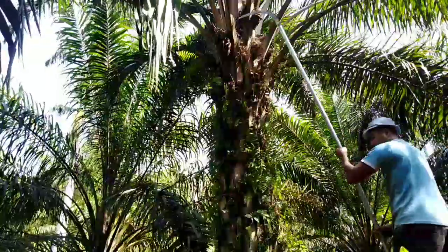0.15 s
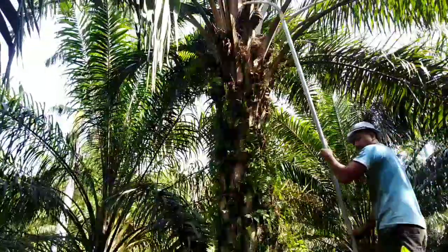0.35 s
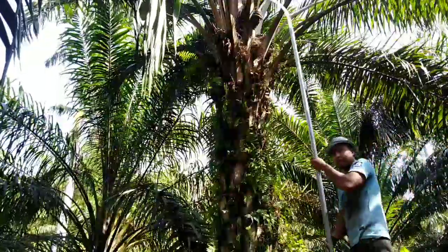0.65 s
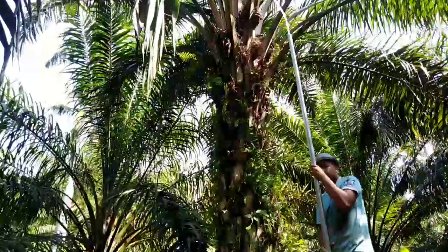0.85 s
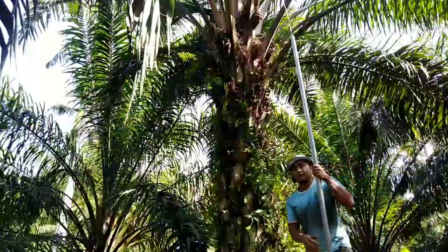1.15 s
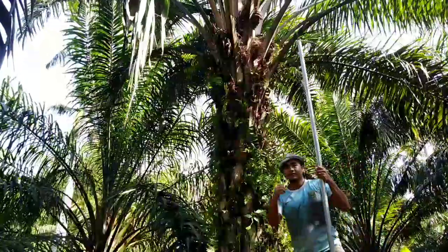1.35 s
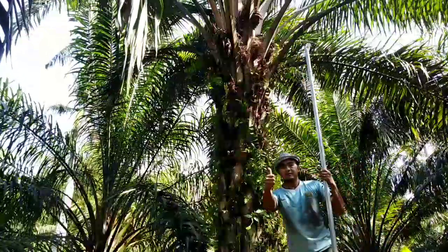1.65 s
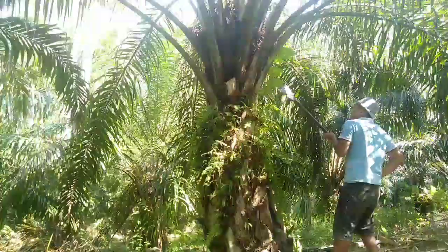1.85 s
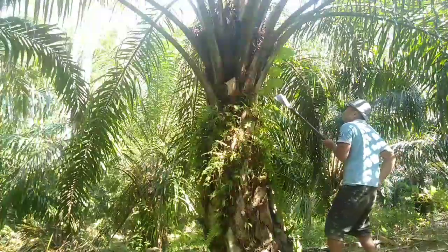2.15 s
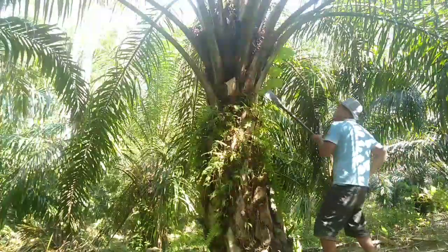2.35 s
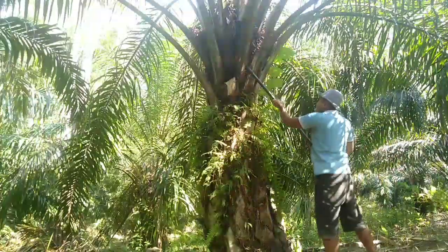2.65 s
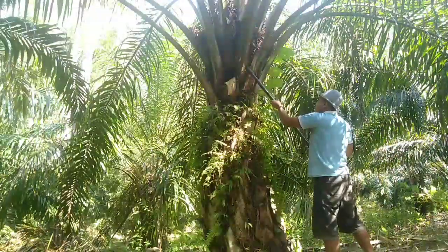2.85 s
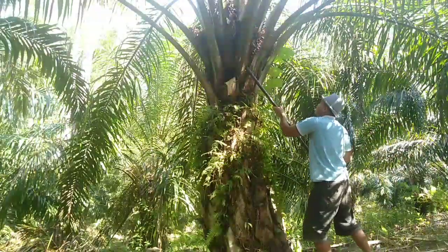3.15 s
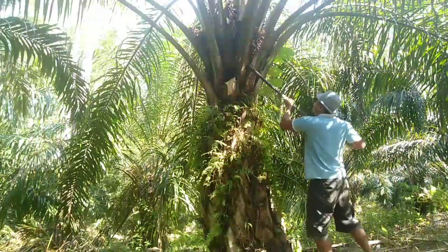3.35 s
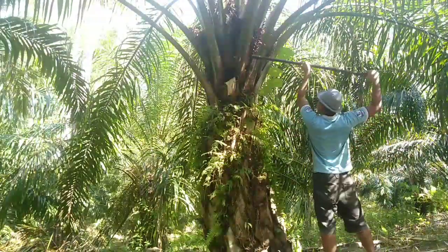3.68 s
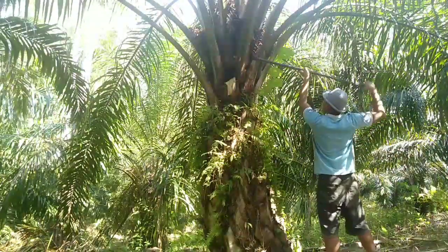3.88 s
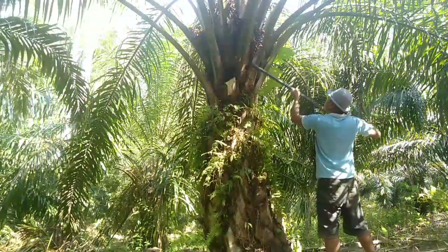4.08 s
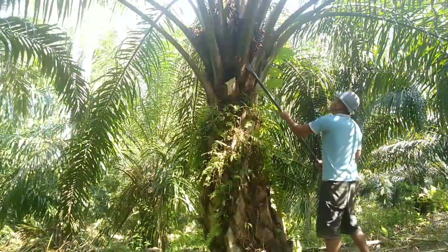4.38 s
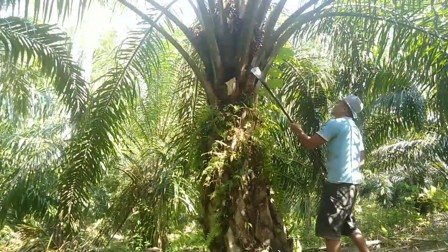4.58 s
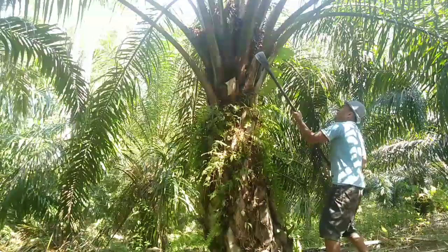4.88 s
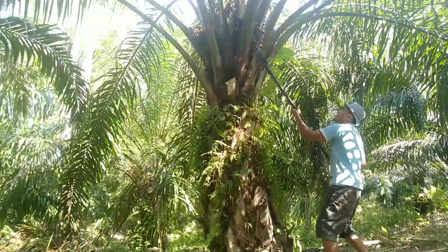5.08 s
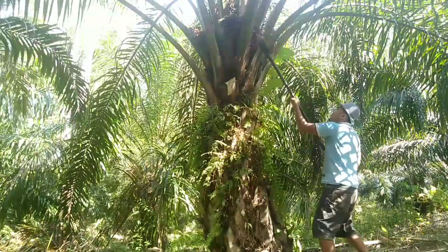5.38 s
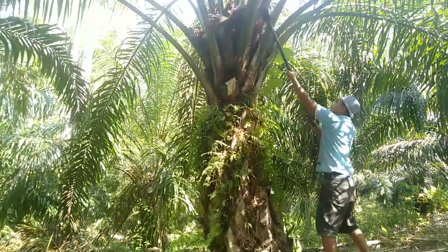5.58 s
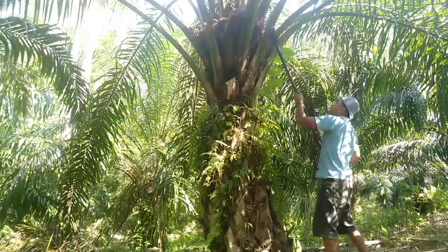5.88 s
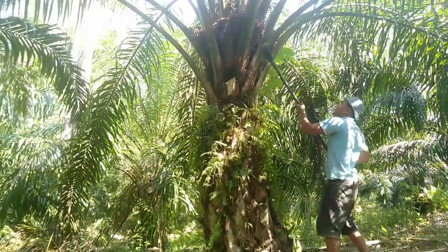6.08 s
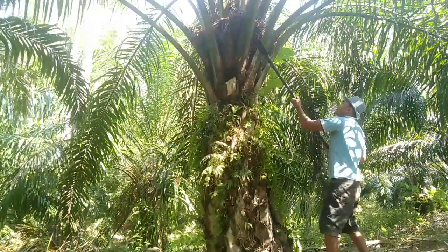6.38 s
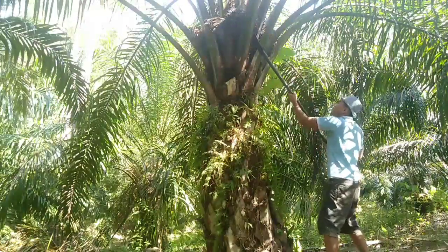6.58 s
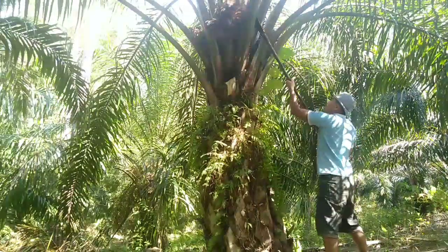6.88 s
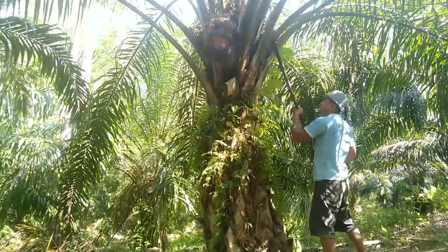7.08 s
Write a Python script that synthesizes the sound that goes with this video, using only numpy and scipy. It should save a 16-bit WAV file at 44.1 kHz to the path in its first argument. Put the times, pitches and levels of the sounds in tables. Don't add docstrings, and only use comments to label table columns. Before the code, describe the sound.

Dry palm fronds rustle and scrape under a long pole, then sharp chops, fibre cracks and tearing bursts over a faint engine drone.

```python
import sys
import numpy as np
from scipy import signal
from scipy.io import wavfile
from scipy.ndimage import uniform_filter1d

SR = 44100
rng = np.random.default_rng(int(sys.argv[2]) if len(sys.argv) > 2 else 0)


def wav_out(sig):
    wavfile.write(sys.argv[1], SR, np.round(np.clip(np.atleast_2d(sig).T, -1, 1) * 32767).astype(np.int16))


def elevation(decibels):
    levels = np.asarray(decibels, float)
    return 10 ** (levels / 20)


N = 318843
MOVE_S = 2.105


def rms_one(x):
    return x / np.sqrt(np.mean(x ** 2) + 1e-20)


def peak_one(x):
    return x / np.max(np.abs(x))


def in_time(tables):
    held = [np.r_[later[0][0] - .002, rows[-1][1:]][None] for rows, later in zip(tables, tables[1:])]
    rows = np.concatenate(list(tables) + held)
    s, *columns = rows[np.argsort(rows[:, 0])].T
    return [np.interp(np.arange(N) / SR, s, column) for column in columns]


def at_hz(points, hz):
    point_hz, value = np.array(points).T
    return np.interp(np.log(hz), np.log(point_hz), value)


def drift(rate_hz):
    r = np.exp(-80 * np.pi * rate_hz / SR)
    slow = signal.lfilter([1], [1, -2 * r, r * r], rng.standard_normal(N // 40 + 2002))
    slow = rms_one(slow[2000:])
    return np.interp(np.arange(N) / 40, np.arange(len(slow)), slow)


def resonate(x, hz, width_hz):
    r = np.exp(-np.pi * width_hz / SR)
    zeros = np.array([1, 0, -1]) * (1 - r * r) / 2
    return signal.lfilter(zeros, [1, -2 * r * np.cos(2 * np.pi * hz / SR), r * r], x)


def twice(x, hz, width_hz):
    return resonate(resonate(x, hz, width_hz), hz, width_hz)


def add(out, sound, s, pan_db=0, lag=0):
    end = round(MOVE_S * SR) if s < MOVE_S else N
    for row, channel, sign, late in zip(sound * np.ones((2, 1)), out, [.5, -.5], [lag, 0]):
        i = round(s * SR) + late
        channel[i:min(i + len(row), end)] += row[:end - i] * elevation(sign * pan_db)


# [f/Hz, likeness -1..1]
ALIKE_FIRST = [(60, 0.7), (180, 0.6), (540, 0.7), (1630, -0.32), (4900, -0.1), (14700, 0.2)]
ALIKE_SECOND = [(60, .9), (180, 0.7), (540, 0.8), (1630, 0.083), (4900, 0.27), (14700, 0.1)]


def stereo_bands(edges_hz, gain_db_of_hz, grit, patchy_db, patch_rate):
    out, white = 0, rng.standard_normal((2, 2, N)) * grit
    first = np.arange(N) < MOVE_S * SR
    for k, (low, high) in enumerate(zip(edges_hz, edges_hz[1:])):
        band = signal.butter(2, [low, high], "band", fs=SR, output="sos")
        mid, side = rms_one(signal.sosfilt(band, white[k % 2]))
        hz = np.sqrt(low * high)
        alike = np.where(first, at_hz(ALIKE_FIRST, hz), at_hz(ALIKE_SECOND, hz))
        alike = np.clip(alike, -1, 1)
        gain = elevation(gain_db_of_hz(hz) + patchy_db * drift(patch_rate))
        out = out + gain * (np.sqrt(1 + alike) * mid + np.sqrt(1 - alike) * side * [[1], [-1]])
    return out


# [f/Hz, level/dB per Hz]
RUMBLE_COLOUR = [(12, -50), (20, -54), (59, 2.5), (140, 3), (170, 0), (300, -35.5), (390, -58), (660, -120)]
# [t/s, rumble level/dB, exhaust note level/dB]
ENGINE_LEVELS = [
    [(0.0, -50, -55), (0.77, -50.5, -62.5), (2.1, -52, -84.5)],
    [(2.11, -62, -65), (2.88, -52, -53), (3.06, -56.5, -58), (6.74, -52.5, -48), (7.23, -55, -50.5)],
]
EXHAUST_HZ = 150.7


def engine():
    rumble_db, note_db = in_time(ENGINE_LEVELS)
    edges_hz = 20 * 2 ** np.arange(0, 4.1, .33)

    def band_db(hz):
        return at_hz(RUMBLE_COLOUR, hz) + 10 * np.log10(hz)

    rumble = stereo_bands(edges_hz, band_db, 1, patchy_db=1.0, patch_rate=4.6)
    note_hz = EXHAUST_HZ + 1.3 * drift(8.5)
    note = elevation(note_db + 1.0 * drift(12)) * np.sin(2 * np.pi * np.cumsum(note_hz) / SR)
    return elevation(rumble_db) * rms_one(rumble) + note


# [t/s, peak level/dB, f/Hz, t60/s]
GROUND_THUMPS = [(0.222, -28, 163, 0.066), (0.284, -20, 59.6, 0.088), (0.296, -15.5, 78.5, 0.045),
                 (0.462, -33, 95.5, 0.026), (0.554, -36, 94.2, 0.052), (0.647, -24, 122, 0.082),
                 (0.679, -32, 88.8, 0.023), (0.843, -20.5, 102, 0.077), (1.065, -20.5, 85, 0.14),
                 (1.073, -32, 88.5, 0.44), (1.563, -45, 109, 0.21), (1.843, -30, 101, 0.065),
                 (1.925, -35.5, 117, 0.082), (2.54, -20, 209, 0.0096), (2.589, -11.5, 300, 0.076),
                 (2.817, -36, 187, 0.23), (4.417, -41, 255, 0.052), (4.55, -35.5, 139, 0.058),
                 (4.563, -35, 221, 0.057), (5.302, -24, 209, 0.15), (5.738, -21.5, 222, 0.021),
                 (6.359, -30.5, 195, 0.026), (6.571, -29, 150, 0.19), (6.632, -27, 234, 0.06)]
# [t/s, peak level/dB, f/Hz, t60/s]
STALK_KNOCKS = [(0.283, -27, 542, 0.033), (1.059, -23, 427, 0.044), (1.297, -42, 381, 0.18),
                (1.565, -38, 680, 0.026), (1.931, -34, 395, 0.073), (2.552, -17, 334, 0.11),
                (2.58, -9, 461, 0.05), (2.591, -13.5, 304, 0.056), (2.608, -14, 350, 0.017),
                (2.826, -24.5, 450, 0.051), (2.845, -23, 367, 0.052), (3.371, -45.5, 382, 0.058),
                (3.418, -38.5, 419, 0.086), (3.519, -35, 405, 0.12), (3.652, -28.5, 485, 0.04),
                (3.605, -32, 457, 0.044), (3.618, -32, 403, 0.055), (3.641, -29.5, 470, .04),
                (3.688, -35, 432, 0.075), (3.72, -38.5, 367, 0.099), (0.912, -36, 400, .03),
                (4.273, -54, 317, 0.077), (4.418, -47, 460, 0.068), (4.356, -50, 306, 0.076),
                (4.506, -29, 520, 0.042), (5.305, -10.5, 635, 0.036), (5.587, -29.5, 433, 0.078),
                (5.614, -33, 410, 0.037), (5.732, -21.5, 440, 0.021), (6.419, -30.5, 580, 0.021),
                (6.843, -34, 313, 0.053), (5.309, -21, 386, 0.071), (5.32, -21, 306, 0.023),
                (1.079, -24, 475, 0.054)]
FIRST_LAG = 10


def thumps():
    out, t = np.zeros((2, N)), np.arange(7000) / SR
    for s, peak_db, hz, t60 in GROUND_THUMPS + STALK_KNOCKS:
        fade = elevation(-60 * t / max(t60, .01)) * (1 - np.exp(-t * hz / 0.17))
        puff = rms_one(twice(rng.standard_normal(len(t)), 0.56 * hz, 4.75 * hz))
        thump = peak_one(fade * (np.sin(2 * np.pi * hz * t) + 0.32 * puff))
        add(out, elevation(peak_db) * thump, s, -1.2, lag=FIRST_LAG * (s < MOVE_S))
    return out


# [t/s, length/s, start f/Hz, end f/Hz, level/dB]
RUBS = [(0, .13, 2930, 2930, -50), (.11, .07, 1780, 1880, -49), (3.93, .1, 850, 830, -61),
        (4.19, .3, 1940, 2080, -61), (4.51, .1, 2860, 2960, -55), (4.54, .08, 4780, 4780, -62),
        (4.5, .12, 4050, 4050, -63), (4.57, .11, 1560, 1550, -64), (4.55, .07, 2040, 2010, -57),
        (5.155, .035, 1800, 1800, -58), (3.37, .1, 900, 920, -62), (3.42, .14, 450, 400, -57),
        (3.43, .1, 1280, 1330, -58), (3.43, .08, 680, 660, -58), (4.25, .07, 1450, 1420, -66)]


def creaks():
    out = np.zeros((2, N))
    broken_db, wobble_hz = 2.5 * drift(70), 14.0 * drift(60)
    for s, length, start_hz, end_hz, level_db in RUBS:
        i, along = round(s * SR), np.linspace(0, 1, int(length * SR))
        span = slice(i, i + len(along))
        hz = start_hz + (end_hz - start_hz) * along + wobble_hz[span]
        fade = np.minimum(along / 0.014, 1) * np.minimum((1 - along) / 0.024, 1)
        tone = np.sin(2 * np.pi * np.cumsum(hz) / SR)
        add(out, elevation(level_db + broken_db[span]) * fade * tone, s)
    return out


# [t/s, level/dB, rise/s]
STROKES = [
    (.8392, -20, .0015),
    (.908, -28, .007),
]
# [f/Hz, level in the bite/dB, level in the slip/dB, t60/s]
POLE_MODES = [(880, -10, -8, .2), (1100, -14, -14, .15), (1400, -3, -8, .12), (1630, 2, -10, .12),
              (1880, -4, -7, .14), (2200, -11, -14, .08), (2520, -5, 0, .12), (2990, -6, -7, .13),
              (3480, -8, -9, .13), (3850, -10, -6, .1), (4200, -11, -10, .12), (4880, -10, -9, .12),
              (5450, -13, -11, .08)]


def pole():
    out, t = np.zeros((2, N)), np.arange(6000) / SR
    for k, (s, hit_db, rise_s) in enumerate(STROKES):
        for hz, *mode_db, t60 in POLE_MODES:
            flutter = rms_one(resonate(rng.standard_normal((2, len(t))), hz, 80.0))
            ring = np.sin(2 * np.pi * hz * t + rng.uniform(0, 2 * np.pi)) + 0.8 * flutter
            fade = elevation(hit_db + mode_db[k] - 60 * t / t60) * np.minimum(t / rise_s, 1)
            add(out, fade * ring, s, 1.0)
    return out


# [t/s, hold/s, leaflet level/dB, heft/dB = how much the thick stalks join in]
FROND_SHAKES = [(0, 0.0079, -40, -6.5), (0, 1.121, -48, 2.5), (0.206, 0.084, -42.5, -3),
                (0.413, 0.091, -50, 6.5), (0.628, 0.022, -43, -0.5), (0.74, 0.073, -49, 2),
                (0.833, 0.06, -40.5, 0), (1.117, 0.71, -67, 8), (1.571, 0.07, -62.5, 18.5),
                (1.755, 0.047, -56, -11), (1.792, 0.05, -54, 9), (1.162, 0.21, -61, 13),
                (1.564, 0.11, -62.5, 3), (1.85, 0.3, -53.5, 3.5), (2.015, 0.027, -55.5, 9.5),
                (2.536, 0.03, -33.5, 2.5), (2.583, 0.31, -54, 7.5), (2.541, 3.2, -67.5, -22),
                (3.376, 0.18, -54.5, 5.5), (3.566, 0.19, -45, 0), (3.791, 0.91, -60, -3.5),
                (3.987, 0.04, -50, -17), (4.255, 0.19, -57, -8), (4.503, 0.088, -56.5, 14),
                (5.04, 0.011, -47, -26), (5.155, 0.077, -61.5, -14), (5.26, 0.027, -57.5, -21),
                (5.297, 0.28, -44, -4), (5.616, 1.326, -47, 0.5), (6.995, .3, -47.5, -2),
                (5.788, 0.2, -46, 2), (6.424, 0.0087, -41, -8), (6.556, 0.26, -45.5, -8),
                (6.959, 0.027, -51, -19)]
SHAKE_RISE_S, SETTLE_DB_PER_S, STILL_DB = .006, 152.5, -101


def shaking():
    s, hold, level_db, heft_db = np.transpose(FROND_SHAKES)[:, :, None]
    t = np.arange(0, N / SR + .002, .002)
    alive = (s >= MOVE_S) | (t < MOVE_S)
    rise = np.clip((t - s) / SHAKE_RISE_S + (s == 0), 0, 1)
    settled_db = SETTLE_DB_PER_S * np.maximum(t - s - np.abs(hold), 0)
    power = alive * rise ** 2 * elevation(2 * (level_db - settled_db))
    total = power.sum(axis=0) + elevation(2 * STILL_DB)
    return in_time([np.c_[t, 10 * np.log10(total), (power * heft_db).sum(axis=0) / total]])


# [level at a brisk shake/dB, share of the swing in level, share of the heft]
FROND_PARTS = [
    (-49.5, 1.34, 1.55),
    (-53, 1.45, 0.12),
    (-49, 1.14, 0.054),
    (-48.5, 1.485, 0.00034),
]
PART_HZ = [400, 2000, 4400, 10000]
# [f/Hz, level/dB per band]
LEAF_COLOUR = [(200, -4), (600, -3), (1900, 5), (3200, 4), (5000, 6), (7000, 0.5), (14000, -3.5)]
BRISK_DB = -48
RUSTLE_PAN_DB, FAINT_PAN = 5, 0.16


def rustle(per_s, spread_db, tick_s, tick_db):
    leaflets_db, heft_db = shaking()
    parts_db = []
    for db, swing, heft in FROND_PARTS:
        moved_db = db + swing * (leaflets_db - BRISK_DB) + heft * heft_db
        parts_db.append(np.maximum(moved_db, STILL_DB))
    pan_db = RUSTLE_PAN_DB + FAINT_PAN * (BRISK_DB - leaflets_db)
    born = rng.random(N) < per_s * elevation(3.0 * drift(8)) / SR
    tick_starts = born * elevation(spread_db * np.minimum(rng.exponential(1, N), 3.0))
    grit = 1 + elevation(tick_db) * signal.lfilter([1], [1, -np.exp(-1 / (tick_s * SR))], tick_starts)

    def band_db(hz):
        shares = [np.interp(np.log(hz), np.log(PART_HZ), one) for one in np.eye(4)]
        mixed_db = sum(share * db for share, db in zip(shares, parts_db))
        side_db = np.outer([.5, -.5], pan_db) * min(hz / 2500, 1)
        return mixed_db + at_hz(LEAF_COLOUR, hz) - 10.0 + side_db

    edges_hz = 210 * 2 ** np.arange(0, 6.3, .4)
    return stereo_bands(edges_hz, band_db, grit, patchy_db=2.5, patch_rate=16.0)


# [t/s, peak level/dB,
# f/Hz, t60/s, left-right/dB]
LIGHT_TICKS = [(.226, -27, 5270, 0.037, 4), (.243, -27, 5460, 0.032, 6), (.438, -26.5, 6000, 0.033, 9),
               (.452, -26.5, 5500, .04, 4), (0.84, -22.5, 3000, 0.017, -9), (0.846, -13.5, 1730, 0.012, 1.5),
               (1.795, -40, 4000, .04, 2), (1.89, -48.5, 5000, .03, 2.5), (2.826, -27, 2033, .05, 1),
               (2.8445, -22, 2200, .04, -2.5), (3.574, -33, 3240, .03, -1), (3.606, -23.5, 2160, 0.023, -6),
               (3.652, -23.5, 1910, 0.027, -4), (3.78, -48, 5500, .03, 5), (3.805, -32.5, 4240, 0.037, 11),
               (3.87, -51, 4400, 0.027, 11), (3.928, -43, 6250, 0.015, 14), (3.97, -36.5, 4700, 0.054, 8),
               (4.016, -36, 3470, 0.044, 7), (4.127, -47, 4470, 0.053, 14), (4.21, -50, 3580, .03, 12),
               (4.268, -51, 4500, .04, 8), (4.315, -46, 5300, .04, 18), (4.337, -40.5, 4900, 0.037, 15),
               (4.416, -39, 4160, 0.052, 11), (4.508, -41, 2010, 0.047, -1), (4.554, -42, 1020, 0.049, 1),
               (4.612, -41, 3500, 0.036, 4), (4.689, -41, 4160, .03, 12), (4.796, -53, 5020, 0.037, 12),
               (4.902, -48, 3540, 0.062, 14), (5.045, -35.5, 5000, 0.024, 6), (5.055, -36, 4700, .06, 2.5),
               (5.215, -42, 3000, 0.035, 1), (5.266, -44, 5500, 0.068, 11),
               (5.318, -18.5, 5500, 0.03, 5), (5.338, -23, 1300, 0.022, -5), (5.452, -29, 460, 0.03, -1),
              (5.487, -28.5, 1700, 0.052, -6), (5.526, -31.5, 455, 0.048, -1),
              (5.586, -30, 1260, 0.039, -1), (5.641, -38, 294, 0.034, -2), (5.704, -33.5, 600, 0.029, -3),
              (5.798, -32.5, 580, .04, -3), (5.85, -26.5, 686, 0.031, 1), (5.911, -30, 4500, .03, 16),
              (5.955, -31, 3000, 0.018, 7), (5.985, -36, 785, 0.037, -2), (6.01, -29.5, 4200, 0.034, 8),
              (6.036, -35, 4800, 0.04, 18), (6.074, -33.5, 4960, 0.061, 20), (6.303, -34.5, 483, 0.034, 2),
              (6.352, -36, 4460, .03, 5), (6.386, -41, 1500, .015, 1), (6.458, -25, 5500, 0.032, 7),
              (6.527, -37, 270, 0.087, 0), (6.576, -29.5, 676, .04, 0), (6.595, -40, 2200, 0.037, 5),
              (6.667, -34, 1550, 0.05, -7), (6.717, -31, 696, 0.026, 0), (6.769, -34, 1520, .05, -3),
              (6.797, -24, 2470, 0.068, -3), (6.828, -28.5, 1000, .04, 1), (6.928, -30, 2750, .03, 0),
              (6.965, -30, 1750, 0.028, -7), (6.985, -19, 8000, 0.09, 1), (7.0265, -8.5, 2230, 0.031, -1),
              (7.028, -24, 4440, 0.022, 7), (7.05, -26.5, 3300, 0.11, 8), (7.2205, -6.5, 5470, .01, 1),
              (6.9735, -13.5, 5000, .02, 2), (6.987, -25, 1600, 0.037, -2), (7.2205, -14, 2660, 0.022, -8),
              (7.225, -21, 3494, .05, -0.5)]
# [t/s, peak level/dB, t60/s]
FIBRE_SPITS = [(0.001, -33, .02), (0.4285, -28, .02), (2.05, -45, .02), (2.5392, -32, .02),
               (3.6151, -15, .015), (5.336, -22, .015), (6.6624, -20, .03), (6.797, -40, .02),
               (6.9744, -18, 0.033), (7.023, -19, .03), (7.2201, -16, 0.023)]
SPIT_HZ, TICK_WIDTH = 9000, 0.72


def ticks():
    out, t = np.zeros((2, N)), np.arange(2500) / SR
    for s, peak_db, hz, t60, pan_db in LIGHT_TICKS:
        same, *apart = rng.standard_normal((3, len(t)))
        fade = elevation(-60 * t / max(t60, .005)) * np.minimum(t / 0.00046, 1)
        burst = (same + min(hz / 2500, 1.5) * np.array(apart)) * fade
        add(out, elevation(peak_db) * peak_one(twice(burst, hz, TICK_WIDTH * hz)), s, pan_db)
    top = signal.butter(2, SPIT_HZ, "high", fs=SR, output="sos")
    for s, peak_db, t60 in FIBRE_SPITS:
        burst = rng.standard_normal((2, len(t))) * elevation(-60 * t / max(t60, .005))
        add(out, elevation(peak_db) * peak_one(signal.sosfilt(top, burst)), s, 2.0)
    return out


# [t/s, peak level/dB, f/Hz, t60/s]
PULLING = [(0.2145, -21.5, 895, 0.029), (.247, -29, 1450, 0.038), (0.278, -29, 920, 0.1),
           (0.4092, -28, 3960, 0.086), (0.428, -17, 4840, 0.0072), (0.452, -26.5, 780, 0.1),
           (0.6403, -28, 950, 0.099), (0.838, -17, 2320, 0.097), (0.909, -29.5, 2960, 0.39),
           (1.062, -40, 800, .05), (1.082, -34, 790, 0.075), (1.367, -43.5, 5140, 0.057),
           (1.927, -39.5, 690, 0.33), (2.024, -29.5, 4400, 0.029), (2.052, -22.5, 5900, 0.02)]
# [t/s, peak level/dB, f/Hz, t60/s]
CHOPPING = [(2.297, -57.5, 4880, 0.046), (2.418, -57, 4620, 0.036), (2.5392, -17.5, 2300, 0.075),
            (2.5541, -9, 2000, 0.055), (2.5786, -5.5, 4270, 0.13), (2.589, -8.5, 2500, 0.075),
            (2.598, -9, 1800, 0.07), (2.61, -11, 3600, 0.031), (3.3664, -34, 1970, 0.071),
            (3.4276, -29.5, 2480, 0.17), (3.553, -26.5, 2950, 0.055), (3.6154, -9.5, 1970, 0.028),
            (3.6408, -16, 2670, 0.018), (3.8068, -26, 2080, 0.026), (3.935, -38.5, 1000, 0.016),
            (4.0036, -35, 1700, 0.17), (4.029, -48, 4950, 0.059), (4.3365, -32.5, 2260, 0.03),
            (4.417, -37, 1050, 0.032), (4.5105, -33, 1980, 0.029), (4.5518, -27, 1960, 0.066),
            (4.69, -59, 4760, 0.043), (4.857, -46, 2630, 0.048), (4.995, -44, 5440, 0.046),
            (5.0446, -36, 2260, 0.064), (5.158, -41, 1800, 0.036), (5.214, -41, 5850, 0.056)]
# [t/s, peak level/dB, f/Hz, t60/s]
TEARING = [(5.2997, -20.5, 1283, 0.12), (5.309, -21, 662, 0.0356), (5.3364, -11, 5340, 0.035),
           (5.386, -28, 1260, 0.055), (5.4128, -41, 1990, 0.037), (5.45, -11.5, 2000, 0.035),
           (5.5248, -12, 2460, 0.028), (5.694, -24, 2390, 0.1), (5.726, -23, 1430, 0.068),
           (5.735, -14.5, 1190, 0.046), (5.7899, -26.5, 5200, 0.067), (5.879, -20, 4810, 0.087),
           (6.12, -21, 3100, 0.035), (6.15, -29, 4100, 0.061), (6.3022, -27, 3170, 0.07),
           (6.4151, -33.5, 870, 0.055), (6.4271, -34, 2180, 0.12), (6.448, -25, 2234, 0.088),
           (6.565, -22.5, 2037, 0.194), (6.6641, -16, 2000, 0.046), (6.7544, -24, 1660, 0.053),
           (6.796, -19.5, 6150, 0.034), (6.8399, -20.5, 1304, 0.057), (6.9735, -19, 5096, .055),
           (6.98, -20.5, 2340, 0.09), (6.994, -14.5, 2350, 0.03), (7.026, -9.5, 2570, 0.042),
           (7.2163, -24.5, 897, .06), (7.2203, -2.5, 3294, 0.0087)]
CRACK_LEVELS = [
    -20.5,
    -7,
    -8,
]
CRACK_DB_PER_OCTAVE = -8.5
PAN_DB_PER_OCTAVE, CENTRE_HZ = 4, 1600
SCATTER_DB, SCATTER_T60_S = -16, 0.31


def snaps():
    out, t = np.zeros((2, N)), np.arange(5500) / SR
    top = signal.butter(3, 6000, "high", fs=SR, output="sos")
    rows = [(*row, db) for table, db in zip([PULLING, CHOPPING, TEARING], CRACK_LEVELS) for row in table]
    for s, peak_db, hz, t60, crack_db in rows:
        octaves = np.log2(hz / CENTRE_HZ)
        pan_db = PAN_DB_PER_OCTAVE * octaves
        top_db = peak_db + crack_db + CRACK_DB_PER_OCTAVE * octaves
        crack, apart, ragged, left, right = rng.standard_normal((5, len(t)))
        t60 = max(t60, .005)
        ragged_db = 3.3 * np.repeat(ragged, 40)[:len(t)]
        fade = elevation(-60 * t / t60 + ragged_db) * np.minimum(t / (0.03 * t60), 1)
        fade *= 1 + 1.1 * np.exp(-t / .001)
        differing = signal.lfilter([1, -1], [1, -.4], apart)
        burst = (crack + 0.73 * differing * [[1], [-1]]) * fade
        scatter_fade = elevation(SCATTER_DB - 60 * t / SCATTER_T60_S) * np.minimum(t / 0.0057, 1)
        burst += np.stack([left, right]) * scatter_fade
        broad = twice(burst, 1.2 * hz, 1.8 * hz)
        body = peak_one(twice(burst, hz, .5 * hz) + 0.5 * broad)
        add(out, elevation(peak_db) * body, s, pan_db)
        bright = signal.sosfilt(top, burst * (1 + 1.6 * np.exp(-t / .0015)))
        add(out, elevation(top_db) * peak_one(bright), s, 0.46 * pan_db)
        stalk = peak_one(twice(crack * fade, 540, 860))
        add(out, elevation(peak_db - 18.5) * stalk * min(1500 / hz, 1), s)
    return out


def scene():
    behind = engine() + thumps() + creaks() + pole()
    leaves = rustle(per_s=44, spread_db=9.0, tick_s=0.001, tick_db=-24.5)
    return behind + leaves + ticks() + snaps()


# [f/Hz, level/dB per bin]
HUSH_BELOW = [(200, -110), (350, -75), (2000, -77), (6000, -82), (9500, -81), (12500, -77)]
TOP_OPENS = [0, .428, 2.052, 3.615, 5.337, 6.663, 6.974, 7.222]
CUTOFF_HZ, HISS_DB = 14300, -84


def suppress(x, streak_db, knee_db):
    hz, s, bins = signal.stft(x, SR, nperseg=1024, noverlap=768)
    power = uniform_filter1d(uniform_filter1d(np.abs(bins) ** 2, size=9, axis=1), size=3, axis=2)
    floor_power = elevation(2 * at_hz(HUSH_BELOW, np.maximum(hz, 1)[:, None]))
    weak = 1 / (1 + power / floor_power) ** (6 / knee_db)
    error = rng.standard_normal(bins.shape[1:])
    error = uniform_filter1d(uniform_filter1d(error, size=16, axis=1), size=3, axis=0)
    harsh = np.interp(hz, [1200, 2300, 3200, 7000, 9000], [.4, .8, .3, .4, 1.1])[:, None]
    gain = elevation(weak * streak_db * np.minimum(rms_one(error) - harsh, .8))
    top = hz > CUTOFF_HZ
    gain[:, hz > 15900] = 0
    opened = np.abs(s[:, None] - TOP_OPENS).min(axis=1) < .007
    gain[:, top] *= elevation(-9) * opened
    return signal.istft(bins * gain, SR, nperseg=1024, noverlap=768)[1][:, :N]


def roll_off(x):
    return signal.sosfilt(signal.butter(12, 15900, fs=SR, output="sos"), x)


def record(dry):
    ports = signal.sosfilt(signal.butter(4, 50, "high", fs=SR, output="sos"), dry)
    hushed = suppress(ports, streak_db=12.0, knee_db=6.0)
    low_pass = signal.cheby2(10, 40, CUTOFF_HZ, fs=SR, output="sos")
    hiss = signal.sosfilt(low_pass, rng.standard_normal((2, N)))
    mix = np.clip(hushed + elevation(HISS_DB) * hiss, -1, 1)
    return roll_off(mix)


dry = scene()
out = record(dry)
wav_out(out)
```